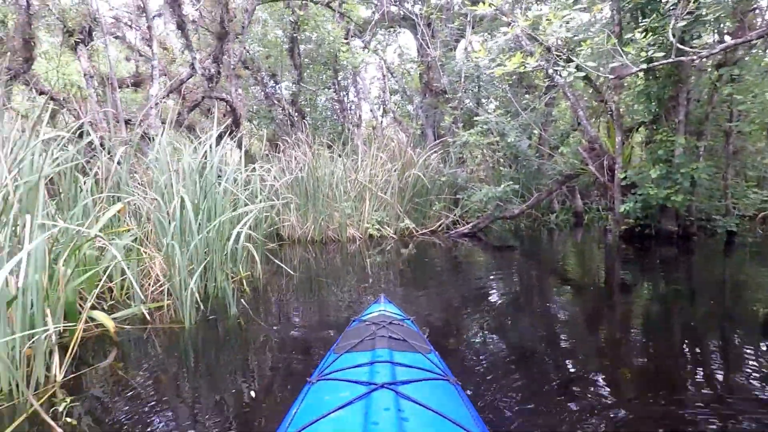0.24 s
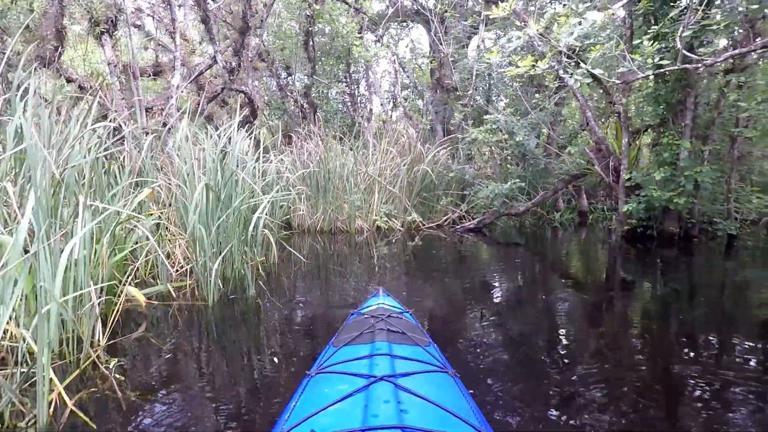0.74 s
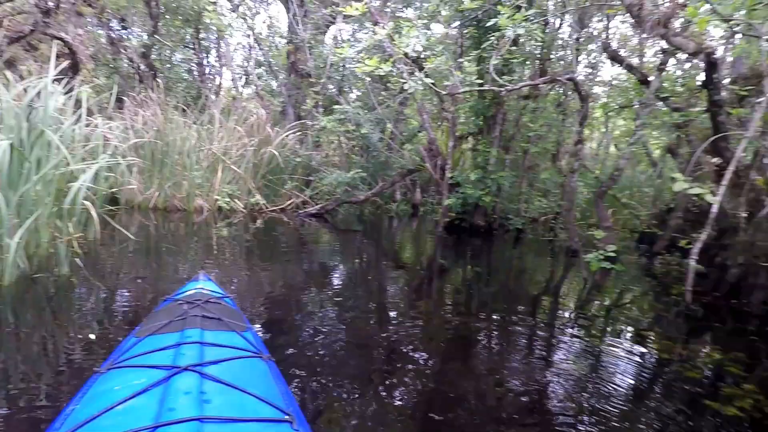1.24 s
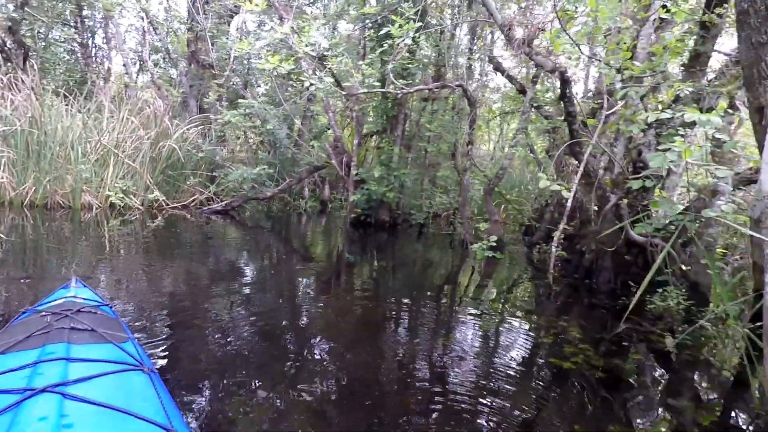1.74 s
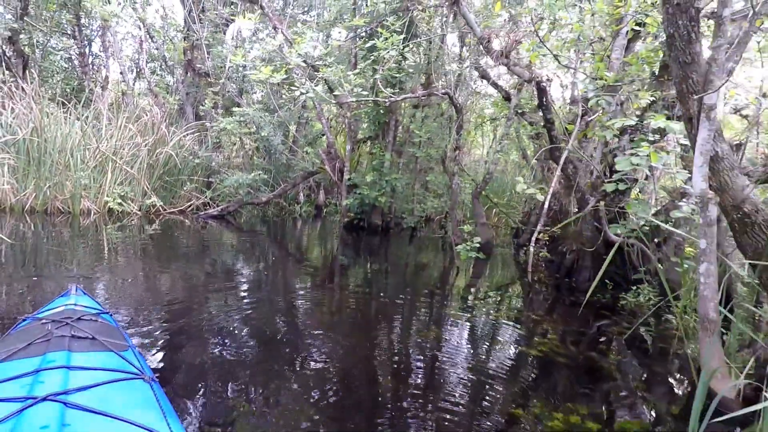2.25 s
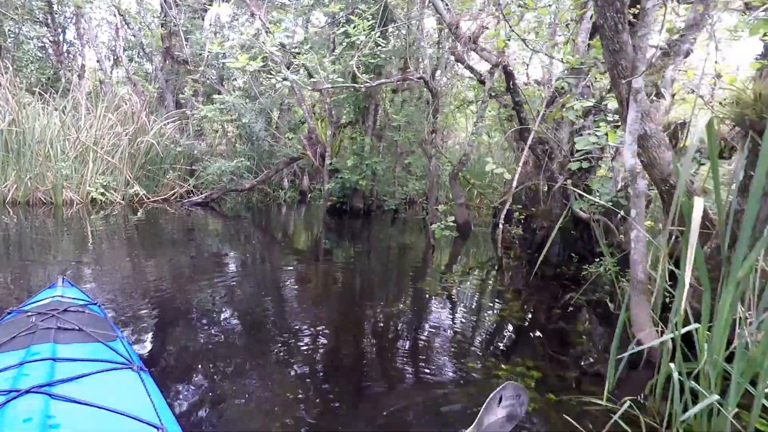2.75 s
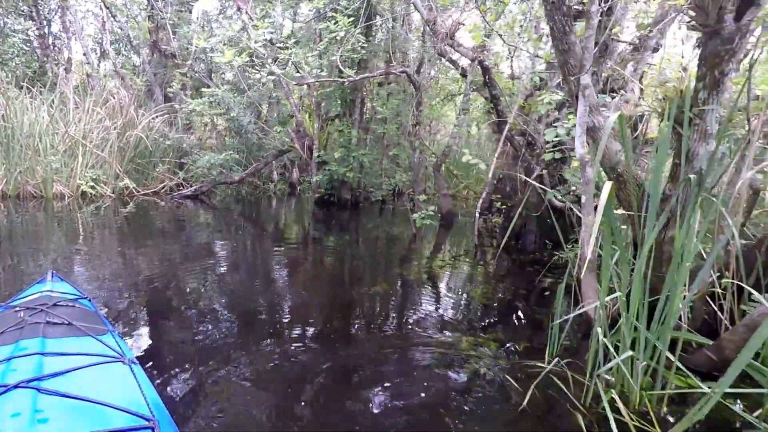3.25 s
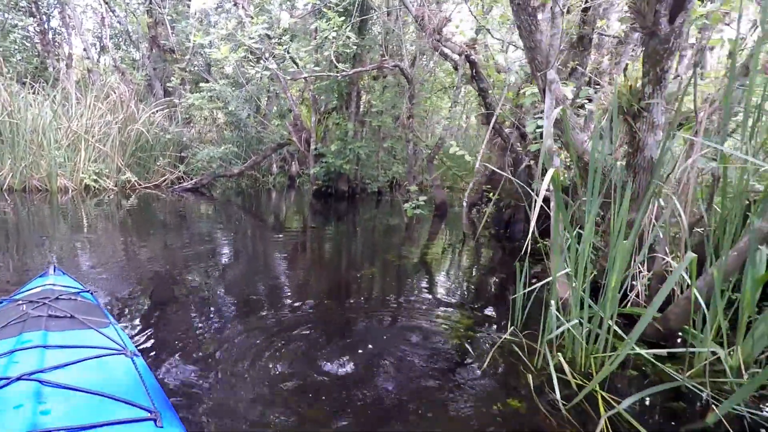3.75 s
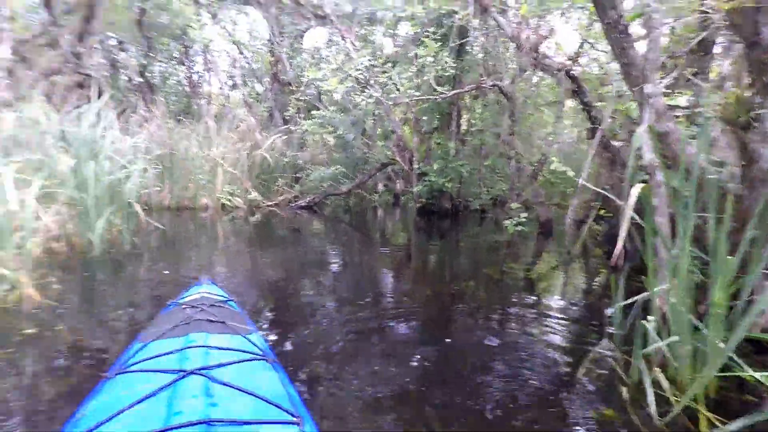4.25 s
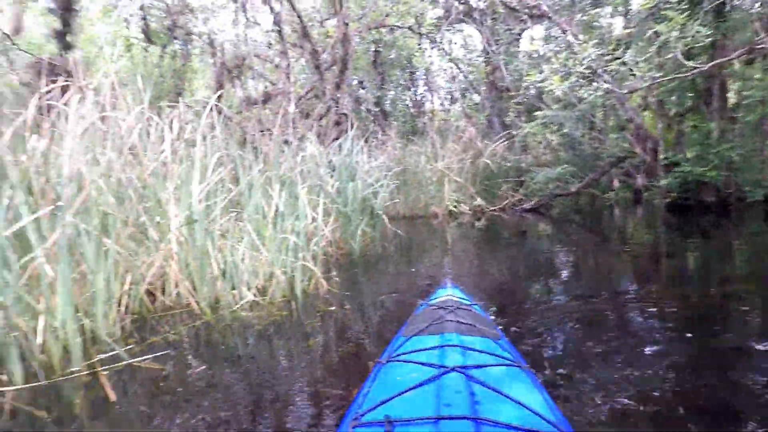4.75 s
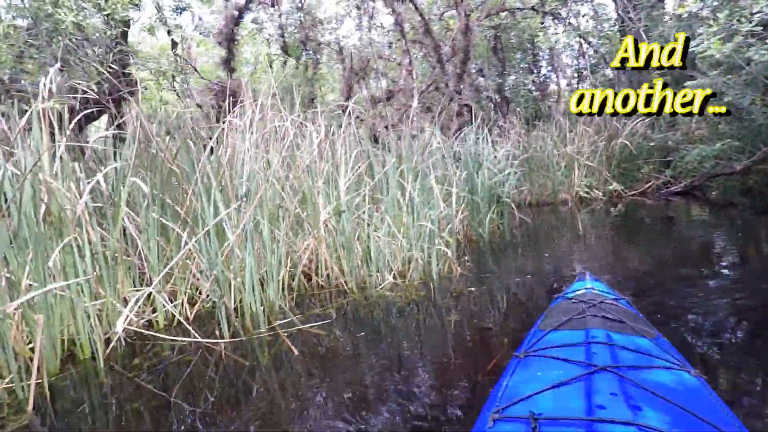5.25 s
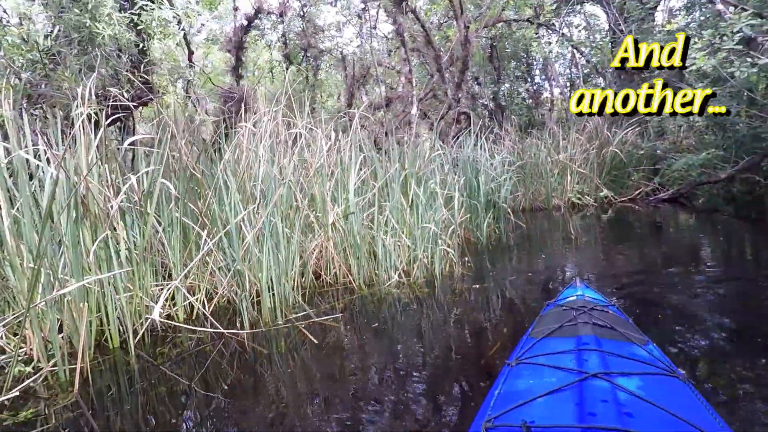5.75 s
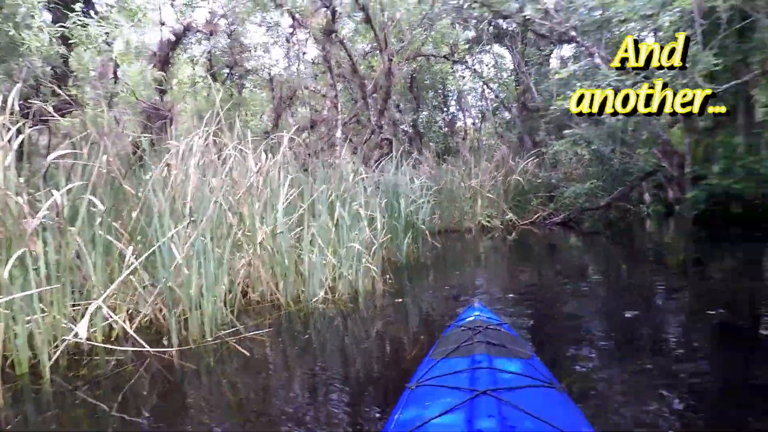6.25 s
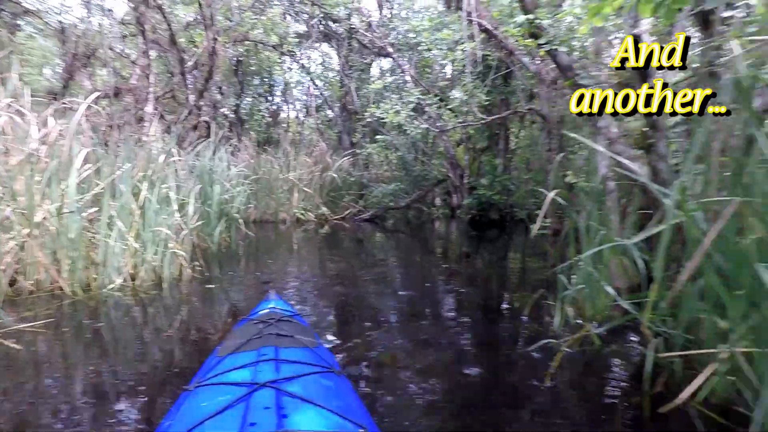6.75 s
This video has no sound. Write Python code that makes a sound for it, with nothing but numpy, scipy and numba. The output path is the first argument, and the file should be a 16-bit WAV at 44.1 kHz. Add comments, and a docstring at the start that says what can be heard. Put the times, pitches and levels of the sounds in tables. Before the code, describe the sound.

Close by, a hollow kayak hull knocks, then drips fall. A distant alligator gives a short, deep, rough bellow over a low drone. Water splashes and trickles off the paddle, thinning out to quiet. A longer bellow swells, then a hard hull knock and tick, bright plops and gurgles, and two more grainy growls fading at the end. Wooded swamp, microphone on the boat with low wind bumps.

```python
"""An alligator growls four phrases, far off in a wooded swamp: rough pulses and breath ring throat, mouth and chest.
Under it a deep drone of pure partials swells and fades, two wavering hums rise late, and filtered noise gives
air shoving at a camera case, swamp rumble and rustling leaves. By a kayak, chirping bubbles make drips and gurgles,
struck modes make hull knocks and dry ticks, and bursts of noise swish like wet reeds."""
import sys
import numpy as np
from scipy import signal
from scipy.fft import rfft, irfft
from scipy.io import wavfile
from scipy.ndimage import uniform_filter1d
from numba import njit

SR = 44100
rng = np.random.default_rng(int(sys.argv[2]) if len(sys.argv) > 2 else 0)


def int16_out(signal):
    """Quantize to a 16-bit WAV file."""
    q = np.round(np.clip(np.atleast_2d(signal).T, -1, 1) * 32767)
    wavfile.write(sys.argv[1], SR, q.astype(np.int16))


N = 308700

# growled phrases: full from t/s, held until t/s, throat level at start/dB, throat level at end/dB,
# mouth minus throat/dB, pulse rate/Hz, roughness [0-1], mouth opening [0-1]
GROWL_PHRASES = [(1.37, 1.965, -26, -31, -13.5, 61.6, 0.76, 0.01),
                 (4.742, 5.806, -34, -32, -15.5, 40.3, 0.67, 0.06),
                 (5.936, 6.273, -28, -30.5, -12.5, 31, .85, 0.1),
                 (6.359, 6.9, -36, -42, -3.5, 20, 0.92, 0.4)]


def undb(db):
    """Gain of a dB value."""
    return 10 ** (np.asarray(db) / 20)


def unit(x):
    """Scaled to rms 1."""
    return x / np.sqrt(np.mean(x ** 2))


def curves(table):
    """Every column after the first, drawn as a line with one value a sample."""
    s, *columns = np.transpose(table)
    return [np.interp(np.arange(N) / SR, s, column) for column in columns]


def bumps(t, table, width_s):
    """Sum of bell-shaped gains, each at its time and peak dB."""
    return sum(undb(db) * np.exp(-((t - s) / width_s) ** 2) for s, db in table)


def band(x, hz, width):
    """Two-pole resonance, gain 1 at the centre."""
    return signal.lfilter(*signal.iirpeak(hz, hz / width, fs=SR), x)


def band_twice(x, hz, width):
    """The same resonance twice, for steeper sides."""
    return band(band(x, hz, width), hz, width)


def smooth_twice(x, samples):
    """Two moving averages in a row."""
    return uniform_filter1d(uniform_filter1d(x, samples), samples)


def walk(rate):
    """Random levels held 1 / rate s and slewed twice; spread near 1."""
    hold = int(SR / rate)
    steps = np.repeat(rng.standard_normal(N // hold + 1), hold)
    return 1.3 * smooth_twice(steps, hold)[:N]


def steady(x, s):
    """Level held near rms 1 over spans of s seconds; faster grain stays."""
    return x / np.sqrt(smooth_twice(x ** 2, int(s * SR)))


def coloured(colour, flicker_db, rate):
    """Noise of a given spectrum in half-octave bands, each flickering alone; rms 1."""
    hz, db = np.transpose(colour)
    f = np.arange(1, N // 2 + 2) * SR / N
    spectrum = rfft(rng.standard_normal(N)) * undb(np.interp(np.log(f), np.log(hz), db, left=-90))
    out = 0
    for centre in np.arange(np.log2(hz[0]), np.log2(hz[-1]) + 1, .5):
        share = np.clip(1 - 2 * np.abs(np.log2(f) - centre), 0, 1)  # neighbouring bands crossfade
        out = out + irfft(spectrum * share, N) * undb(flicker_db * walk(rate))
    return unit(out)


def fade(samples, t60):
    """Exponential decay by 60 dB in t60 s."""
    return np.exp(-np.log(1000) * np.arange(samples) / SR / t60)


def ring(hz, t60, rise=0, onset=0.00041, length=.25):
    """A struck mode with a soft start, its pitch rising by a share while it fades."""
    t = np.arange(int(length * SR)) / SR
    shape = (1 - np.exp(-t / onset)) * fade(len(t), t60)
    return shape * np.sin(2 * np.pi * hz * t * (1 + rise * np.minimum(t / t60, 1) / 2))


def add(out, s, db, sound):
    """Mixes a sound in at a time, at a peak level."""
    i = int(s * SR)
    sound = sound[:N - i]
    out[i:i + len(sound)] += undb(db) * sound / np.abs(sound).max()


def scatter(x, t60):
    """Many overlapping reflections: convolution with a fading noise of energy 1."""
    tail = rng.standard_normal(SR // 2) * fade(SR // 2, t60)
    return signal.fftconvolve(x, tail / np.sqrt(np.sum(tail ** 2)))[:N]


def drone():
    """Clean partials of one slow cycle, shimmering a little in level and phase over the distance."""
    third_hz = 64.77
    # rms levels of the swells: t/s, second partial level/dB, third partial level/dB, seventh partial level/dB
    swells = [(0, -51, -39.5, -65), (1.2, -39.5, -42, -42.5), (1.45, -32, -24.5, -36),
              (1.9, -27.5, -27.5, -48), (2.1, -35.5, -32, -41.5), (3.2, -33.5, -31.5, -43),
              (4.4, -60, -27, -51), (4.8, -40, -24, -39.5), (5.35, -36, -19, -34), (5.8, -37, -22.5, -34),
              (6.1, -34, -31, -39), (6.35, -32, -37, -39), (7, -33.5, -44, -38)]
    t = np.arange(N) / SR
    second_db, third_db, seventh_db = curves(swells)
    levels = [(2, second_db), (3, third_db), (5, seventh_db - 1), (6, seventh_db - 7), (7, seventh_db)]
    out = 0
    for k, db in levels:
        gain = undb(db + 0.41 * walk(11))
        out = out + gain * np.sin(2 * np.pi * (k * third_hz / 3 * t + rng.random()) + 0.1 * walk(6.4))
    return np.sqrt(2) * out  # sine peak from rms


def hums():
    """Two low sines that rise late, wavering in level and phase."""
    # f/Hz, full rms level/dB, full at t/s, rise/(dB per s)
    hum_table = [(80.65, -30, 6.33, 4), (91.2, -37, 6.25, 1.5)]
    t = np.arange(N) / SR
    out = 0
    for hz, db, full_s, rise_db_per_s in hum_table:
        db = db - rise_db_per_s * np.maximum(full_s - t, 0)
        out = out + undb(db + 2.8 * walk(9.0)) * np.sin(2 * np.pi * hz * t + 0.62 * walk(6))
    return np.sqrt(2) * out


def buffeting():
    """Air pushes on the case: low band noise under a gusty level curve and single shoves."""
    gust_db, gusts_per_s, shove_s = 3, 11, 0.032
    # level the gusts play around: t/s, level/dB
    buffet = [(0, -34), (.6, -45), (1.2, -27.5), (1.9, -29), (2.2, -52), (3.2, -38.5), (4.7, -38.5),
              (5.4, -28.5), (7, -53)]
    # single shoves of air: t/s, peak gain/dB
    shoves = [(1.31, -23.5), (1.6, -29), (2.38, -21), (2.759, -23), (2.92, -36), (3.94, -32), (5.26, -29),
              (5.4, -42), (5.63, -38), (6.32, -30)]
    low = signal.sosfilt(signal.butter(2, (16, 48), "band", fs=SR, output="sos"), rng.standard_normal(N))
    push = undb(curves(buffet)[0] + gust_db * walk(gusts_per_s))
    push = push + bumps(np.arange(N) / SR, shoves, shove_s)
    return push * steady(low, 0.12)


def swamp():
    """The far rumble of the swamp: low noise whose bands flicker apart."""
    # spectrum shape: f/Hz, relative density level/dB
    swamp_colour = [(20, -25), (50, -4.5), (90, -4), (130, -16.5), (190, -16.5), (260, -24.5), (480, -29.5),
                    (750, -51.5), (1200, -55.5)]
    return undb(-35.5) * coloured(swamp_colour, 2.4, 13.0)


def leaves():
    """Leaves and reeds rustle: broad flickering noise that follows a level curve."""
    # t/s, level/dB
    rustle = [(0, -56.5), (.6, -55.5), (1.44, -47.5), (1.9, -49), (2.07, -54.5), (4.44, -57.5),
              (5.05, -50.5), (6.04, -48), (6.4, -49.5), (6.71, -47), (7, -50)]
    # spectrum shape: f/Hz, relative density level/dB
    rustle_colour = [(300, 14.5), (700, 5.5), (1300, -0.5), (2000, 0), (2700, 2.5), (3600, -2),
                     (5500, -1.5), (7500, -8.5), (11000, -10.5), (15500, -13)]
    return undb(curves(rustle)[0]) * coloured(rustle_colour, 1.38, 12)


def drop(out, s, db, hz, t60):
    """A bubble swells and rings with rising pitch, beside a weaker neighbour and a splash of noise."""
    onset = 1.6 / hz  # swells over its first cycles
    t60 = max(t60, .004)
    bubble = ring(hz, t60, 0.11, onset, t60)
    neighbour = ring(hz * (0.94 + 0.264 * rng.random()), 1.6 * t60, 0.15, onset, t60)
    add(out, s, db, bubble + 0.19 * neighbour)
    spray = fade(SR // 25, .04) * band_twice(rng.standard_normal(SR // 25), hz, hz)
    add(out, s, db - 7, spray)


def drips():
    """The clearest drips off the paddle: splashy plops, each with a ringing bubble."""
    # t/s, bubble peak level/dB, bubble f/Hz, ring t60/s (at least 0.004 s is used)
    clear_drips = [(0.154, -39.5, 2980, 0.0066), (0.509, -47.5, 1190, 0.043), (0.561, -47, 800, 0.011),
                   (0.613, -44, 2570, 0.015), (0.648, -49, 1400, 0.014), (0.816, -41, 2080, 0.021),
                   (1.01, -41.5, 1085, 0.062), (1.07, -37, 2810, 0.0046), (1.245, -33.5, 1770, 0.027),
                   (1.806, -41, 1103, 0.12), (1.806, -31, 1470, 0.05), (1.844, -31, 1667, 0.027),
                   (2.003, -41, 1276, 0.061), (2.087, -38, 1235, 0.026), (2.122, -33, 4700, 0.0087),
                   (2.237, -41.5, 2680, 0.018), (2.3, -37, 1130, 0.015), (2.3, -36, 1820, 0.0074),
                   (2.308, -35, 1260, 0.0093), (2.308, -35.5, 2284, 0.018), (2.325, -42, 2700, 0.01),
                   (2.334, -44, 1875, 0.021), (2.35, -39.5, 5650, 0.0068), (2.411, -37.5, 2260, 0.0062),
                   (2.412, -44.5, 754, 0.068), (2.423, -41, 2320, 0.011), (2.437, -47, 700, 0.012),
                   (2.494, -51, 2800, 0.014), (2.503, -47, 2120, 0.024), (2.536, -42, 2780, 0.0069),
                   (2.538, -43.5, 874, 0.078), (2.558, -43, 2255, 0.012), (2.563, -39, 1420, 0.021),
                   (2.579, -41, 2420, 0.01), (2.579, -43, 950, 0.01), (2.608, -52, 537, 0.034),
                   (2.62, -40.5, 2550, 0.0074), (2.638, -45.5, 890, 0.039), (2.647, -48, 2480, 0.01),
                   (2.73, -48, 2840, 0.02), (2.795, -48, 1850, 0.016), (2.865, -47, 2550, .01),
                   (2.88, -46, 2350, .01), (2.977, -49, 2000, 0.0082), (3.03, -55, 2700, .015),
                   (3.185, -53, 1300, 0.027), (3.22, -48, 2200, .012), (2.729, -44.5, 714, 0.054),
                   (2.732, -41.5, 1780, 0.038), (2.774, -40.5, 1670, 0.0091), (2.837, -46, 1900, 0.019),
                   (2.865, -46, 2130, 0.0078), (2.94, -43, 2060, 0.011), (3.034, -44, 1990, 0.013),
                   (3.075, -42, 2040, 0.01), (3.109, -44.5, 533, 0.073), (3.119, -39.5, 2600, 0.015),
                   (3.202, -42.5, 1820, 0.033), (3.295, -43, 2510, 0.028), (3.496, -39, 1920, 0.011),
                   (3.636, -47, 2845, 0.016), (3.679, -48, 2640, 0.02), (3.694, -47, 2900, 0.019),
                   (3.725, -42.5, 2710, 0.028), (3.773, -52, 2380, 0.02), (3.794, -56, 2030, 0.019),
                   (3.828, -47, 2280, 0.015), (3.849, -49, 1920, 0.017), (3.868, -53, 2580, 0.023),
                   (3.829, -42.5, 1590, 0.01), (3.984, -54, 1840, .03), (4.331, -49, 2120, 0.013),
                   (4.475, -48, 3600, .008), (4.545, -47, 3400, .01), (4.572, -44, 2560, .03),
                   (4.595, -52, 1500, .015), (4.624, -40.5, 2970, 0.0061), (4.632, -50, 2800, .02),
                   (4.688, -53, 3100, .01), (4.805, -50, 1550, .015), (4.875, -53, 2540, .025),
                   (4.888, -50, 2250, .012), (4.844, -41.5, 2020, 0.0083), (5.651, -38, 4600, 0.015),
                   (5.716, -31.5, 2610, 0.022), (5.933, -30.5, 2500, 0.015), (5.961, -21, 1550, 0.017),
                   (5.97, -42, 2070, 0.015), (5.982, -43, 1620, 0.02), (6.091, -32, 1075, 0.022),
                   (6.157, -37, 1730, 0.02), (6.163, -34, 2967, 0.015), (6.176, -33.5, 1400, 0.014),
                   (6.176, -25, 2780, 0.019), (6.264, -37.5, 3100, 0.01), (6.291, -37, 2171, 0.0054),
                   (6.386, -46, 657, 0.078), (6.442, -40, 1900, 0.01), (6.45, -33.5, 1142, 0.013),
                   (6.451, -33, 1460, 0.039), (6.473, -38.5, 735, 0.074), (6.755, -38, 2750, 0.0096),
                   (6.799, -37, 2370, 0.01), (6.8, -31, 1710, 0.013), (6.852, -44, 1522, 0.0091)]
    out = np.zeros(N)
    for s, db, hz, t60 in clear_drips:
        drop(out, s, db, hz, t60)
    return out


def trickle(count=500):
    """Faint droplets at random times and pitches, denser in the higher notes, as water runs off the paddle."""
    base_db = -60  # peak before the random spread and the run-off
    # level change after each stroke: from t/s, change of level/dB (negative is quieter), fade constant/s
    runoff = [(1.8, 7.5, 0.66), (2.3, 4.5, 0.97), (5.7, -4, .5), (5.95, 14, 0.97)]
    out = np.zeros(N)
    when, size, pitch = rng.random((count, 3)).T
    s, hz = when * N / SR, 800 * 4 ** np.sqrt(pitch)
    db = base_db - 1.3 * np.log(size + 0.011)  # a few stand out
    for start, extra_db, fade_s in runoff:
        db = db + extra_db * (s > start) * np.exp(-np.abs(s - start) / fade_s)
    for droplet in zip(s, db, hz, 30 / hz):
        drop(out, *droplet)
    return out


def gurgles():
    """Bubbles glide in pitch, nearly all climbing as they near the surface, with a fluttering level."""
    # t/s, peak level/dB, from f/Hz, to f/Hz, length/s
    gurgle_table = [(.525, -50, 650, 950, .032), (.566, -49, 700, 1050, .042), (.775, -49, 720, 1350, .035),
                    (2.415, -48, 740, 950, .03), (2.565, -47, 1400, 1520, .03),
                    (2.665, -52, 950, 1150, .025), (3.43, -57, 1800, 1830, .13),
                    (3.88, -58, 1680, 1830, .15), (4.33, -52, 2100, 2800, .018), (5.93, -43, 600, 900, .02),
                    (5.946, -35, 900, 1500, .016), (6.085, -40, 740, 850, .04),
                    (6.108, -42, 2350, 2850, .03), (6.135, -39, 1300, 2000, .015),
                    (6.33, -33, 480, 500, .05), (6.37, -41, 560, 680, .05), (6.413, -45, 2450, 3300, .022),
                    (6.425, -45, 720, 1250, .026), (6.468, -40, 1500, 2100, .012),
                    (6.485, -45, 720, 950, .025), (6.503, -45, 900, 1400, .02),
                    (6.57, -46, 1100, 950, .015)]
    out = np.zeros(N)
    for s, db, from_hz, to_hz, length in gurgle_table:
        u = np.linspace(0, 1, int(length * SR))
        flutter = uniform_filter1d(rng.standard_normal(len(u)), size=150) * np.sqrt(150)
        glide = np.sin(2 * np.pi * np.cumsum(from_hz * (to_hz / from_hz) ** u) / SR)
        add(out, s, db, np.sin(np.pi * u) * undb(3.0 * flutter) * glide)
    return out


def ticks():
    """Dry ticks of stems and cords: a short bright crack of noise and the ringing modes of the camera case."""
    # t/s, peak level/dB, crack level before an 18 dB lift/dB, change of modes above 4 kHz/dB,
    # share of the case's pitch
    tick_table = [(0.125, -40, -35, -30, 1), (0.3447, -41, -26, -7.5, 1.03), (1.244, -35, -33, -15, 0.98),
                  (1.268, -36, -24, -9, 0.83), (1.363, -28.5, -18, -1, 0.99), (1.9494, -40, -25, -2, 1.3),
                  (2.4113, -42, -29, -14, 1.05), (2.6451, -35, -14, -20, 0.94), (3.671, -41, -18, -13, 1.1),
                  (4.5558, -38, -26, -12, 1.36), (4.5654, -29.5, -27, -14, 1.07),
                  (4.574, -34, -23, -3, 1.08), (5.8207, -17, -39, -20.5, .92), (5.9207, -40, -22, -2, 0.82),
                  (5.9332, -37, -27, -6, 1.04), (6.0883, -13, -27.5, -18, 1.08),
                  (6.1094, -35, -14, -12, 1.1), (6.189, -33, -7, -11, 1.05), (6.6236, -25.5, 9, 13.5, 1.07)]
    # modes before each tick's changes: f/Hz, relative level/dB, t60/s
    case_modes = [(1830, -15, 0.035), (2370, 0, 0.0062), (2520, 5, 0.013), (3230, -3, 0.012),
                  (4730, 21, 0.009), (5500, 17.5, 0.0076), (6000, 15, 0.0075)]
    out = np.zeros(N)
    for s, db, crack_db, upper_db, pitch in tick_table:
        rings = 0
        for hz, mode_db, t60 in case_modes:
            luck = rng.standard_normal()  # no two ticks ring quite alike
            gain = undb(mode_db + 2 * luck + upper_db * (hz > 4000))
            rings = rings + gain * ring(pitch * hz * (1 + .02 * luck), t60)
        crack = np.diff(rng.standard_normal(SR // 4 + 1)) * np.exp(-np.arange(SR // 4) / SR / .0012)
        add(out, s, db, rings + undb(crack_db + 18.0) * crack)
    return out


def swishes():
    """Wet reeds swish: bell-shaped bursts of grainy band noise."""
    # centre t/s, time to 1/e either side/s, peak gain/dB
    swish_table = [(2.334, 0.025, -60), (2.436, 0.023, -62), (2.58, 0.084, -70), (2.746, 0.04, -63),
                   (2.87, 0.027, -77.5), (2.95, .3, -81), (3.208, 0.053, -63), (4.6, 0.046, -65),
                   (4.866, 0.03, -61), (3.073, 0.041, -61), (3.7, 0.035, -66), (5.844, 0.026, -58),
                   (6.054, 0.019, -42), (6.13, 0.022, -46.5), (6.574, 0.012, -60), (6.684, 0.11, -68)]
    t = np.arange(N) / SR
    wet = unit(band(band(rng.standard_normal(N), 2050, 1900), 2600, 4400)) * undb(2 * walk(230))
    return wet * sum(bumps(t, [(s, db)], length) for s, length, db in swish_table)


def knocks():
    """Each blow rings the hull's modes; a hard one cracks and reaches the high modes; bending waves bring lows late."""
    swing_hz = 540  # below this, neighbouring modes start in opposite directions
    # t/s, peak level of the modes/dB, hardness [0-1], share of the full ring time
    blows = [(0.1255, -17.5, 0.81, 0.44), (0.167, -32.5, 0.7, 1), (0.201, -27, 0.64, 0.41),
             (0.231, -34.5, 0.1, 0.51), (0.255, -32.5, 0.3, 0.47), (.3, -41, 0.3, 0.42),
             (.376, -37, 0.05, 0.36), (1.227, -27, 0.05, 0.59), (4.541, -29.5, 0.18, 0.35),
             (4.553, -43, 0.06, 0.19), (4.566, -32.5, 0, 0.27), (4.588, -32.5, 0.05, 0.72),
             (4.62, -33.5, 0.04, 1), (5.829, -10, 0.83, 0.44)]
    # modes before each blow's tilt and chance: f/Hz, relative level/dB, full t60/s
    hull_modes = [(227, -29.5, 0.11), (277, -5.5, 0.061), (359.6, -4.5, 0.12), (411, -7.5, 0.15),
                  (485, -4.5, 0.16), (531, -6, 0.1), (603, 0.5, 0.078), (690, -20, 0.12),
                  (702, -0.5, 0.063), (833, 2, 0.026), (937, 7, 0.036), (1160, 6, 0.039), (1170, 2, 0.036),
                  (1230, 3, 0.041), (1500, 5, 0.039), (1540, 8, 0.036), (1670, 0, 0.04), (1680, -21, 0.027),
                  (1980, -10, 0.045), (2630, -15, .03), (3100, -18, 0.03)]
    out = np.zeros(N)
    t = np.arange(SR // 4) / SR
    for s, db, hard, share in blows:
        modes = 0
        for k, (hz, mode_db, t60) in enumerate(hull_modes):
            luck = rng.standard_normal()
            sign = (-1) ** (k * (hz < swing_hz))
            tilt_db = -14.8 * (1.5 - hard) * np.log2(hz / 350)  # softer blows are duller
            mode = ring(hz * (1 + 0.014 * luck), share * t60, onset=3.66 * share / hz)
            modes = modes + sign * undb(mode_db + 1.5 * luck + tilt_db) * mode
        crack = band(rng.standard_normal(SR // 4), 1800, 1250) * np.exp(-t / 0.014)
        thud = band_twice(rng.standard_normal(SR // 4), 500, 660) * np.exp(-t / (0.023 * share))
        add(out, s, db, modes)
        add(out, s + 0.000896, db - 11.5, thud)  # the many close modes blur into a woody body
        add(out, s, db - 34 - 20 * (1 - hard), crack)
    return out + undb(-7.0) * scatter(out, 0.17)  # the hollow hull rumbles on


def phrases():
    """Gains of throat, mouth and chest: every phrase rises, holds and falls, and lingers more weakly."""
    attack_db_per_s, release_db_per_s = 101, 98
    linger_db, linger_db_per_s, chest_db = -5, 12, -3  # chest against throat
    # floor between phrases: throat level/dB, mouth level/dB, chest level/dB
    rest_db = (-64, -71, -64)
    t = np.arange(N) / SR
    throat, mouth, chest = (undb(db) ** 2 for db in rest_db)
    for start, end, first_db, last_db, mouth_db, *_ in GROWL_PHRASES:
        db = np.interp(t, (start, end), (first_db, last_db)) - attack_db_per_s * np.maximum(start - t, 0)
        after = np.maximum(t - end, 0)
        power = undb(db - release_db_per_s * after) ** 2
        power = power + (after > 0) * undb(db + linger_db - linger_db_per_s * after) ** 2
        throat = throat + power
        mouth = mouth + power * undb(mouth_db) ** 2
        chest = chest + power * undb(chest_db) ** 2
    return np.sqrt([throat, mouth, chest])


@njit
def sliding(x, hz, width):
    """Band-pass whose centre moves every sample, gain 1 at the centre."""
    y, b, l = np.empty(len(x)), 0., 0.  # b and l: band and low states
    for i in range(len(x)):
        g, k = np.tan(np.pi * hz[i] / SR), width / hz[i]
        v = (b + g * (x[i] - l)) / (1 + g * (g + k))
        b, l, y[i] = 2 * v - b, l + 2 * g * v, k * v
    return y


def cavity(x, hz, width, stretch, hold_s):
    """A steep resonance that slides with the stretch and wobbles alone, held near rms 1."""
    hz = hz * stretch * (1 + .04 * walk(9))
    return steady(sliding(sliding(x, hz, width), hz, width), hold_s)


def lowpass(x, order, hz):
    """Butterworth low-pass."""
    return signal.sosfilt(signal.butter(order, hz, fs=SR, output="sos"), x)


def vocal_folds(rate, rough):
    """Uneven flaps of the vocal folds and a puff of air after each; roughness trades flaps for puffs."""
    phase = np.cumsum(rate * (1 + 0.33 * rough * walk(50))) / SR
    pulses = np.diff(np.floor(phase), prepend=0) * np.sqrt(SR / rate)
    pulses = pulses * undb(5.0 * rough * rng.standard_normal(N // 50)[phase.astype(int)])
    puffs = unit(np.exp(-(phase % 1) / 0.48)) * rng.standard_normal(N)
    return np.sqrt(1 - rough) * pulses + np.sqrt(rough) * puffs


def growl():
    """Flaps and puffs, scattered and dulled on their way, ring sliding resonances of throat, mouth and chest."""
    far_t60_s, far_direct, surge_s = .1, .7, 0.026  # direct: share of unscattered sound
    # base resonance: f/Hz, width of each filter pass/Hz
    chest_mode = (87.4, 44)
    # base resonances: f/Hz, width of each filter pass/Hz, relative level/dB
    throat_modes = [(125, 38, -2), (198.2, 50.5, 1), (246.2, 69, 0)]
    # base resonances, nearly shut then open: f/Hz, width of each filter pass/Hz
    mouth_modes = [(430, 126), (510, 130)]
    # resonances slide as the throat stretches: t/s, share of their pitch
    throat_stretch = [(0, 1.04), (1.3, 0.9), (1.5, 0.94), (1.7, 0.91), (2.0, 0.93), (4.7, 1.05),
                      (5.0, 0.92), (5.3, 0.96), (5.8, 0.93), (6.0, 0.951), (6.3, 0.958), (7, 0.8)]
    # throaty surges within the phrases: t/s, extra level on the throat/dB (the mouth gets 0.66 of it)
    surges = [(1.368, -1), (1.5, 2), (1.57, 1.5), (1.7, 5.5), (1.84, 4), (1.95, 3.5), (4.79, 0),
              (4.92, 5.5), (5.45, 4), (5.55, 2), (6.0, 3), (6.075, 3.5), (6.21, 3), (6.31, 3), (6.62, 4),
              (6.97, 4.5)]
    rate, rough, opening = curves([(s, *row[5:]) for row in GROWL_PHRASES for s in row[:2]])
    source = vocal_folds(rate, rough)
    swaying = sum(np.sin(3 * walk(6) + k) * scatter(source, far_t60_s) for k in range(4)) / 2  # swaying paths
    source = lowpass(far_direct * source + swaying, 5, 580)  # distance dulls it
    deep = lowpass(source, 4, 290)  # the throat passes little above this
    stretch, t = curves(throat_stretch)[0], np.arange(N) / SR
    throat = sum(undb(db) * cavity(deep, hz, width, stretch, 0.061) for hz, width, db in throat_modes)
    shut, wide, chest = (cavity(source, hz, width, stretch, 0.066) for hz, width in (*mouth_modes, chest_mode))
    mouth = np.sqrt(np.clip(1 - opening, 0, 1)) * shut + np.sqrt(np.clip(opening, 0, 1)) * wide
    surge_db = sum(db * np.exp(-((t - s) / surge_s) ** 2) for s, db in surges)
    voices = [unit(throat) * undb(surge_db), mouth * undb(0.66 * surge_db), chest]
    return np.sum(phrases() * voices, axis=0)


def scene():
    """Sums all layers; near sounds get a short scatter from trunks and water."""
    trees_t60_s, trees_db = .14, -13
    far = drone() + hums() + buffeting() + swamp() + leaves()
    near = drips() + trickle() + gurgles() + ticks() + swishes() + knocks()
    return (far + near + undb(trees_db) * scatter(near, trees_t60_s) + growl())[None]


def record(dry):
    """The camera cuts the top: a steep low-pass at 15.4 kHz."""
    return signal.sosfilt(signal.ellip(10, .2, 70, 15400, fs=SR, output="sos"), dry)


dry = scene()
out = record(dry)
int16_out(out)
```